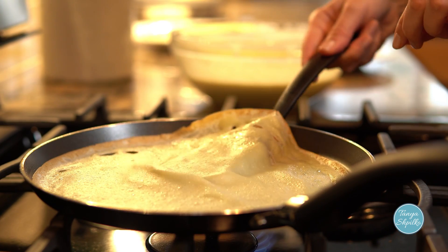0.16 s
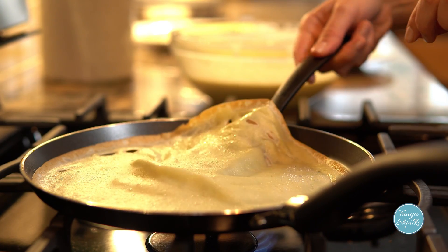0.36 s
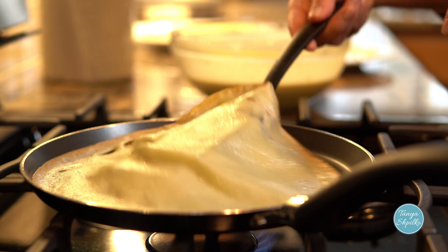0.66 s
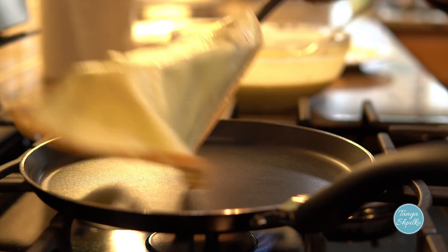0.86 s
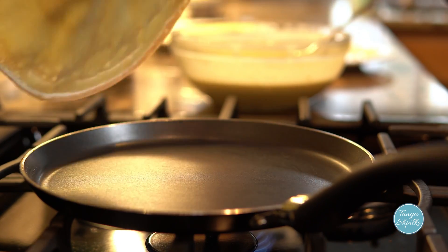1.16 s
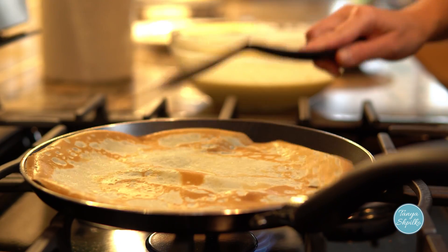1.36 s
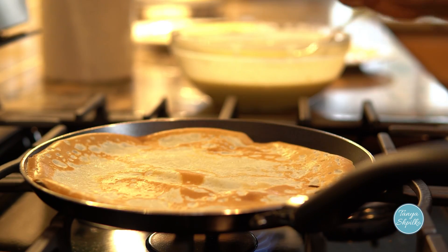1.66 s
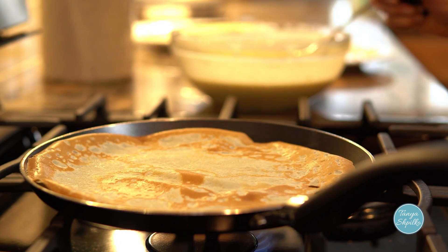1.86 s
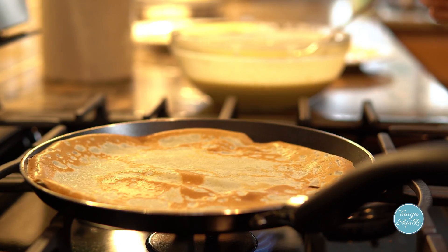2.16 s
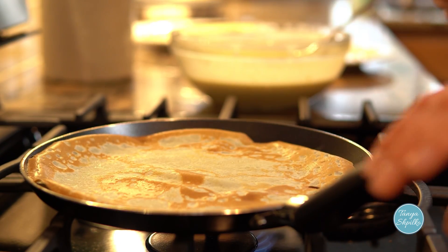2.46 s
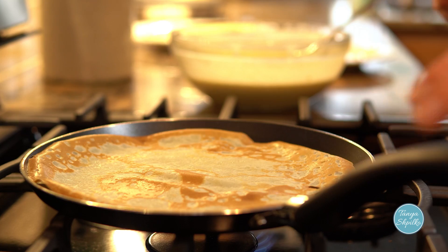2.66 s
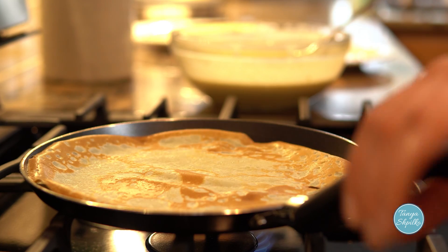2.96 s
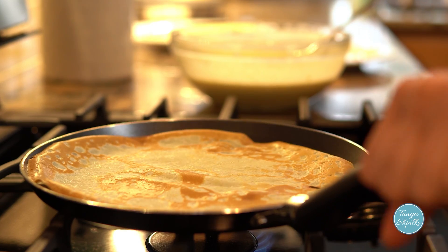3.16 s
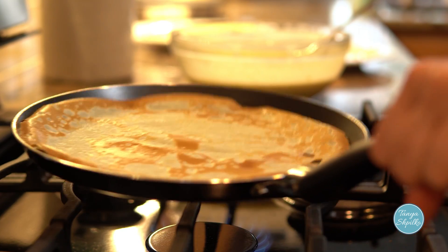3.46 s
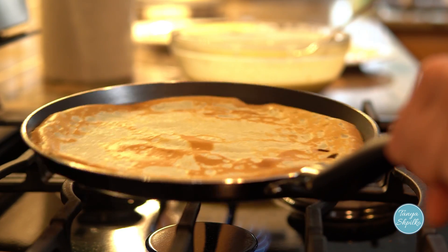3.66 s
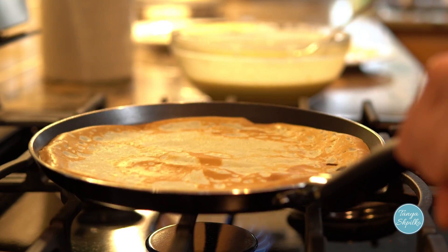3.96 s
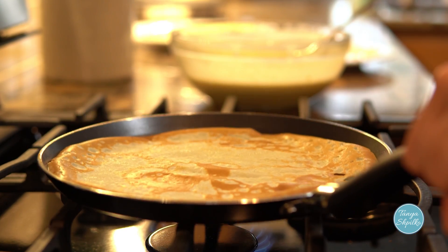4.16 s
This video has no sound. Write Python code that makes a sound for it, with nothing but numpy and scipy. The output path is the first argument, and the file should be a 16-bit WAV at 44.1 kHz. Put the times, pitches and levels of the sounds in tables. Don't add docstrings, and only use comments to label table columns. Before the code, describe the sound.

Quiet kitchen hum, a floppy slap and sudden crackling sizzle, then a short metallic drag and sharp knock as the pan lifts off the hob.

```python
import sys
import numpy as np
from scipy import signal
from scipy.fft import rfft, irfft
from scipy.io import wavfile
from scipy.ndimage import uniform_filter1d

SR = 44100
rng = np.random.default_rng(int(sys.argv[2]) if len(sys.argv) > 2 else 0)


def nominal_scale(level):
    x = np.asarray(level, float) / 20
    return 10 ** x


def store_pcm(level_fs):
    pcm = np.round(np.clip(level_fs, -1, 1) * 32767).astype(np.int16)
    wavfile.write(sys.argv[1], SR, np.atleast_2d(pcm).T)


N = 190268
TIME = np.arange(N) / SR
LAND_S, LIFT_S = 1.358, 3.34

# f/Hz, likeness [0-1]
STEAM_SAME = [(60, 1.0), (150, 1), (380, 0.96), (950, 0.79), (2380, 0.74), (5980, 0.53), (15000, 0.59)]


def evened(x):
    return x / np.sqrt(np.mean(x ** 2) + 1e-20)


def read(points, hz):
    f, value = np.transpose(points)
    return np.interp(np.log(hz + 1), np.log(f + 1), value)


def add(mix, s, sound):
    part = mix[..., round(s * SR):][..., :sound.shape[-1]]
    part += sound[..., :part.shape[-1]]


def resonate(x, hz, width):
    turn = np.exp(2j * np.pi * np.cumsum(hz * np.ones(len(x))) / SR)
    r = np.exp(-np.pi * width / SR)
    return 2 * (turn * signal.lfilter([1 - r], [1, -r], x / turn)).real


def coloured(x, points):
    n = x.shape[-1]
    gain = nominal_scale(read(points, np.fft.rfftfreq(n, 1 / SR)))
    return evened(irfft(rfft(x) * gain, n))


def clicks(shape, per_s, spread_db):
    when = rng.random(shape)
    size = rng.exponential(1, shape)
    sign = rng.choice([-1., 1.], shape)
    return (when < per_s / SR) * sign * nominal_scale(spread_db * np.minimum(size, 4))


def paired(x, same):
    same = np.clip(same, 0, 1)
    return np.array([x[0], same * x[0] + np.sqrt(1 - same ** 2) * x[1]])


def kitchen():
    # f/Hz, density level/dB
    air = [(15, -63.5), (25, -24), (50, -4.5), (75, -5), (260, -11.5), (359, -12.5), (445, -17.5),
           (722, -20.5), (1300, -27.5), (1660, -26.5), (2170, -31), (3830, -36), (15500, -50.5)]
    # f/Hz, likeness [0-1]
    air_same = [(60, 1.0), (180, 0.4), (550, 0.56), (1650, 0.24), (4970, 0.41), (15000, 0.36)]
    # f/Hz, width/Hz, level/dB
    jets = [
        (71, 21, -70.5),
        (92.15, 25, -66),
        (373.6, 66, -74),
        (3003, 566, -78),
        (3814, 610, -78.5),
    ]
    z = paired(rfft(rng.standard_normal((2, N))), read(air_same, np.fft.rfftfreq(N, 1 / SR)))
    noise = irfft(z, N)
    swell = nominal_scale(-2.5 + 6.5 * np.exp(-((TIME - 3.37) / 0.57) ** 2))
    bands = np.zeros((2, N))
    for band, ear in zip(bands, noise):
        for hz, width, db in jets:
            tone = evened(resonate(resonate(ear, hz, width), hz, width))
            band += nominal_scale(db) * tone * (swell if hz < 200 else 1)
    return nominal_scale(-64.5) * coloured(noise, air) + bands


def room(x):
    # f/Hz, t60/s
    decay = [(200, 0.23), (1000, 0.33), (4000, 0.248), (12000, 0.22)]
    # f/Hz, level/dB
    bass = [(150, -12), (450, -5), (900, 0)]
    taps = np.zeros((2, SR // 2))
    slots = np.arange(120, SR // 2 - 20, 20)
    at = slots + rng.integers(0, 20, (2, len(slots)))
    np.put_along_axis(taps, at, rng.choice([-1., 1.], at.shape), 1)
    hz, t, z = signal.stft(taps, SR, nperseg=256)
    z = paired(z, read(STEAM_SAME, hz)[:, None] - .25)
    decay_db = read(bass, hz)[:, None] - 60 * t / read(decay, hz)[:, None]
    tail = signal.istft(z * nominal_scale(decay_db), SR, nperseg=256)[1]
    return signal.fftconvolve(x[None], tail / np.linalg.norm(tail[0]), axes=1)[:, :N]


def bumps():
    # t/s, peak level/dB, f/Hz, t60/s
    soft_blows = [(.8765, -35, 864, 0.0265), (.878, -40, 1870, 0.013), (1.366, -37, 205, .12),
                  (1.368, -39, 405, .15), (1.43, -37, 404, .5), (1.43, -41, 548, .4), (1.42, -43, 1040, .3),
                  (1.475, -41, 232, .3), (1.41, -36, 140, .06), (2.402, -52.5, 484, 0.056),
                  (2.405, -57, 542.4, 0.098), (2.416, -43, 215, 0.18), (2.42, -55.5, 308.3, 0.262),
                  (2.43, -55, 396.2, 0.187), (2.853, -44, 170, 0.12), (2.856, -45, 132, 0.3),
                  (2.887, -44, 155, 0.13), (2.912, -46, 140, .15), (2.951, -45, 135, 0.13),
                  (2.985, -48, 108, 0.185)]
    # t/s, peak level/dB, f/Hz, t60/s, rise/s
    rim = [
        (3.326, -28.5, 1750, 0.095, 0.005),
        (3.385, -25, 1750, 0.3, 0.05),
        (3.39, -33, 1776, .22, .03),
        (3.384, -36, 1797, 0.4, .05),
    ]
    out, t = np.zeros(N), np.arange(SR // 2) / SR
    soft = [(s, db, hz, t60, 0.58 / hz) for s, db, hz, t60 in soft_blows]
    for s, db, hz, t60, rise in soft + rim:
        add(out, s, nominal_scale(db - 60 * t / t60) * np.sin(2 * np.pi * hz * t) * (1 - np.exp(-t / rise)))
    return out


def stroke(peak, db, rise, fall, hz, note_db, upper_db, upper, rasp):
    t = np.arange(-SR // 10, SR // 5) / SR
    fade_db = -24 * np.where(t < 0, -t / rise, t / fall) ** 2
    slips = clicks(len(t), 8000, 3.2)
    tones = nominal_scale(note_db) * evened(resonate(resonate(slips, hz, 75.0), hz, 415))
    tones += nominal_scale(upper_db - 6.0) * evened(resonate(resonate(slips, *upper), upper[0], 590))
    return peak + t[0], nominal_scale(db + 1.3 * fade_db) * tones + nominal_scale(db + fade_db) * coloured(slips, rasp)


def scraping():
    # t/s at the peak, rasp level/dB, rise/s, fall/s, blade note f/Hz
    strokes = [
        [(.112, -52.5, .07, .05, 850), (.222, -61, .075, .055, 815)],
        [(.845, -65, 0.081, 0.0225, 798.5), (.878, -55, 0.03, 0.01, 865), (.912, -61, 0.042, -0.03, 860)],
    ]
    # f/Hz, width/Hz
    upper_notes = [
        (1280, 140),
        (2050, 770),
    ]
    # f/Hz, density level/dB
    rasps = [
        [(880, -34.5), (1500, 1.5), (2050, -3), (2800, -5.5), (3210, 0.5), (3800, -7.5), (4610, -11.5),
         (6250, -11), (7230, -14), (7980, -23.5), (15500, -41.5)],
        [(880, -50.5), (1500, -1), (1670, -14), (1860, -15), (2220, -25), (2590, -10), (3280, -2.5),
         (5190, -14), (6820, -16.5), (8540, -22.5), (15500, -23)],
    ]
    # blade note level/dB, upper note level/dB
    blade_db = [
        (-9.5, 3),
        (-2, 1),
        (9.5, 3),
        (-0.5, 4.5),
        (-12, -26),
    ]
    out = np.zeros(N)
    pushes = [(row, upper, rasp) for rows, upper, rasp in zip(strokes, upper_notes, rasps) for row in rows]
    for (row, upper, rasp), levels in zip(pushes, blade_db):
        add(out, *stroke(*row, *levels, upper, rasp))
    return out


def drag():
    # t/s, rumble level/dB
    pressure = [
        (3.165, -53),
        (3.178, -52),
        (3.193, -40.5),
        (3.25, -28),
        (3.311, -26),
        (3.338, -25.5),
        (3.423, -41.5),
        (3.62, -75),
    ]
    # f/Hz, width/Hz, level/dB
    grate = [
        (205, 23.4, 0),
        (228, 70, 4),
        (292, 40, -31),
    ]
    # f/Hz, width/Hz, level/dB
    body = [(333.2, 14, -4), (418.4, 25, -5), (465.8, 53, -3), (554.4, 14.5, -6.5), (646, 97, -1.5),
            (727, 89, -9), (851, 17.78, -9), (1040, 73, -5), (1173, 20, -5.5), (1365, 17, -5),
            (1573, 11, -13), (2013, 120, -5.5), (2130, 30, -13), (2670, 116, -14.5)]
    # t/s, level/dB
    bites = [
        (3.229, -42),
        (3.312, -36.5),
        (3.341, -42),
    ]
    # f/Hz, width/Hz, level/dB
    bite_notes = [
        (3800, 1900, 4),
        (6800, 270, -7),
    ]
    # f/Hz, level/dB, t60/s
    lifted = [(539, -48.5, 0.78), (562, -49, 0.565), (573.4, -52.5, 0.8), (606.5, -51, 1), (721, -49, 0.8),
              (737, -49.5, 0.75), (1175, -45, 0.55), (1200, -52, .45), (1314, -48, 0.71),
              (1515, -47.5, 0.69), (2140, -41, 0.45)]
    # t/s, peak level/dB, brightness f/Hz, grit level/dB
    catches = [
        (3.176, -34, 2100, -12.5),
        (3.1923, -29.5, 1215, -12.5),
        (3.2269, -22.5, 2130, -7.5),
        (3.265, -22.5, 1020, -6.5),
        (3.2984, -31, 1970, -14),
        (3.3154, -24, 2050, -5),
        (3.3258, -25, 1750, -12),
        (3.3399, -8, 1500, -14),
        (3.3543, -22, 1694, -26.5),
        (3.3849, -44.5, 1750, -15),
    ]
    s, rumble_db = np.transpose(pressure)
    t = np.arange(s[0], s[0] + 0.83, 1 / SR)
    press_db = np.interp(t, s, rumble_db)
    moving = np.clip((s[-1] - t) / 0.038, 0, 1) * np.clip((t - s[0]) / 0.017, 0, 1)
    slips = evened(clicks(len(t), 1700, 2.1)) * moving

    def shaken(modes, db):
        force = slips * nominal_scale(db)
        return sum(nominal_scale(d) * np.sqrt(SR / w / 8) * resonate(resonate(force, f, w), f, 4 * w) for f, w, d in modes)

    sound = shaken(grate, press_db - 24.0)
    sound += shaken(body, -15 + 0.66 * press_db - 10.5)
    bite = nominal_scale(-49.5 + 0.26 * press_db) + sum(nominal_scale(db - 1100 * abs(t - at)) for at, db in bites)
    squeal = sum(nominal_scale(d) * evened(resonate(resonate(slips, f, w), f, 2 * w)) for f, w, d in bite_notes)
    sound += bite * nominal_scale(-5.5) * evened(squeal)

    wobbles = rng.standard_normal((len(lifted), len(t)))
    wobbles = uniform_filter1d(uniform_filter1d(wobbles, 500, axis=1), 500, axis=1)
    for (hz, db, t60), wobble in zip(lifted, wobbles):
        decay = nominal_scale(db - 3.5 - 60 * 1.15 * (t - s[0]) / t60)
        add(sound, LIFT_S - s[0], decay * (1 + 1.05 * evened(wobble)) * np.sin(2 * np.pi * hz * t))

    u = np.arange(1024) / SR
    band = signal.butter(2, (900, 7000), "band", fs=SR)
    for (at, db, hz, grit_db), noise in zip(catches, rng.standard_normal((len(catches), 1024))):
        grit = evened(resonate(resonate(noise, hz, 1460), hz, 1440))
        grit += nominal_scale(grit_db) * signal.lfilter(*band, noise)
        grit *= nominal_scale(-60 * u / 0.041)
        add(sound, at - s[0], nominal_scale(db - 11.0) * grit / abs(grit).max())
    return s[0], sound


def brief_notes():
    # t/s at the peak, peak level/dB, f/Hz,
    # rise/s
    fold_notes = [(1.3644, -35.5, 3315, .0015), (1.3643, -34, 1050, 0.00194), (1.3724, -26, 1650, .002),
                  (1.372, -37, 2860, 0.00098), (1.375, -28, 1012, 0.00292), (1.374, -30, 2000, 0.00297),
                  (1.3725, -31, 650, 0.00203), (1.386, -31, 3117, .003), (1.388, -35, 841, 0.00394),
                  (1.391, -31, 1235, 0.00402), (1.391, -33, 1652, 0.00399), (1.391, -33.5, 1950, 0.00304),
                  (1.4075, -24, 1407, 0.00199), (1.411, -26, 3196, 0.0031), (1.4135, -25, 2013, .003),
                  (1.4145, -26.5, 2906, 0.001995), (1.414, -29, 4500, 0.0023), (1.4155, -25, 1605, 0.00299),
                  (1.413, -35, 855, 0.00303), (1.414, -33, 470, 0.004), (1.415, -31, 193, 0.00706),
                  (1.428, -32, 218.7, 0.0069), (1.426, -38, 489.3, 0.00596), (1.430, -36, 3227, .002),
                  (1.433, -32.5, 1621, 0.00302), (1.434, -32.5, 3797, 0.0021), (1.447, -35, 221, 0.01),
                  (1.487, -42.5, 224, .012), (1.451, -49, 904, .006), (1.481, -54, 872, 0.0081),
                  (1.501, -48, 397.6, 0.0101), (1.545, -54, 410.6, 0.0137), (1.802, -41, 2200, .003),
                  (1.801, -40, 3800, .002)]
    # t/s at the peak, peak level/dB, f/Hz, rise/s
    jolts = [(3.183, -42.5, 215, 0.0057), (3.202, -30, 225, 0.0075), (3.240, -26.5, 220, 0.0085),
             (3.272, -33, 211, 0.00606), (3.284, -35, 205, 0.0038), (3.301, -34, 227, 0.00413),
             (3.322, -33, 200.3, 0.00595), (3.334, -28.5, 208, 0.00707), (3.354, -35, 246.6, .004),
             (3.368, -36, 224, 0.0039), (3.379, -35.5, 209.3, 0.00398), (3.391, -40.5, 226, 0.00404),
             (3.415, -41.5, 198, 0.0068), (3.433, -41.5, 222.5, 0.0069), (3.445, -42, 236, 0.0038),
             (3.464, -52, 222, 0.0053)]
    # t/s at the peak, peak level/dB, f/Hz, rise/s
    bar_notes = [(3.197, -46.5, 1330, 0.00392), (3.199, -46, 1074, .004), (3.216, -47, 1053, .004),
                 (3.217, -47, 1354, .004), (3.228, -42.5, 2020, 0.0029), (3.231, -47, 1024, .004),
                 (3.249, -43, 736, .005), (3.264, -45, 2093, 0.00302), (3.267, -40, 1050, .003),
                 (3.275, -38, 455, .006), (3.277, -45, 793, .004), (3.291, -37, 564, .006),
                 (3.302, -43, 979, .004), (3.2275, -41.5, 4650, .002), (3.227, -48, 6900, .0015),
                 (3.227, -43.5, 3300, .001), (3.296, -40.5, 3760, .003), (3.309, -43, 4490, .002),
                 (3.314, -42, 4000, .002), (3.313, -43, 6800, .004), (3.3415, -39, 3700, .001),
                 (3.3435, -38, 5200, .001), (3.342, -41.5, 6520, .001), (3.304, -39, 636, .005),
                 (3.315, -35, 470.5, 0.0049), (3.311, -43, 1994, .009), (3.329, -38, 601, .006),
                 (3.3416, -24, 1197, .0016), (3.3411, -23.5, 1684, .0014), (3.343, -35, 2200, .002),
                 (3.342, -32, 2650, 0.00195), (3.353, -31, 397, 0.005), (3.30, -38, 352, .008),
                 (3.25, -42, 400, .008), (3.33, -37, 412, .006), (3.3565, -30, 1686, 0.002002),
                 (3.358, -36, 1040, .003), (3.365, -33, 1710, 0.00302), (3.367, -39.5, 780, 0.00404),
                 (3.373, -40, 486, 0.00496), (3.377, -38, 1300, .004), (3.390, -41, 1090, 0.00397),
                 (3.398, -43, 547, 0.01001), (3.401, -46, 2110, .006), (3.407, -40, 1530, 0.00602),
                 (3.436, -44, 678, 0.007024), (3.45, -47.5, 554.3, .012), (3.60, -64, 732, .025),
                 (3.64, -61, 553.7, .02)]
    # t/s at the peak, peak level/dB, f/Hz, rise/s
    blade_notes = [(.082, -53, 1243, 0.00607), (.097, -50, 1301, .008), (.116, -53, 815.3, 0.00705),
                   (0.11, -60, 1275, 0.00474), (.116, -56, 3177, 0.0046), (.232, -57.5, 817, .01),
                   (0.19, -59, 3316, .008), (.19, -60, 3600, .005), (.265, -60, 3250, .003),
                   (.24, -61, 1388, .008), (.835, -51, 818, 0.00998), (.86, -51, 805, .008),
                   (.876, -50, 1830, 0.0052), (.88, -50, 2300, .005), (.895, -51, 872, .005),
                   (.868, -53, 2200, .004), (.879, -54, 4300, .002), (.897, -58, 2250, .002),
                   (.92, -58, 880, .006), (.87, -54, 650, .008), (.885, -52, 1080, .005),
                   (.845, -57, 1050, .006), (.905, -58, 680, .008), (.12, -55, 3600, .004),
                   (.11, -58, 1900, .008), (.245, -60, 1750, .005)]
    out = np.zeros(N)
    for s, db, hz, rise in fold_notes + jolts + bar_notes + blade_notes:
        t = np.arange(0, 8 * rise, 1 / SR)
        swell = (t / rise * np.exp(1 - t / rise)) ** 2
        add(out, s - rise, nominal_scale(db) * swell * np.sin(2 * np.pi * hz * t))
    return out


def spurts(t):
    # t/s, swell level/dB
    escapes = [
        (1.41, 2.4),
        (1.56, 1.9),
        (1.82, 1.03),
        (2.42, 1.75),
        (2.57, 1.79),
        (2.83, 1.55),
        (3.7, 0.84),
        (3.878, 1.4),
    ]
    return sum(db * np.exp(-((t - s) / 0.067) ** 2) for s, db in escapes)


def steam_db(t):
    since = np.maximum(t - LAND_S, 0)
    simmer = -74.5 - 5 * t
    landed = -42 - 3.5 * since + 3 * np.exp(-since / 0.26) + spurts(t)
    share = np.minimum(since / 0.0183, 1)
    return (1 - share) * simmer + share * landed


def wetness(t):
    start, top, end, soak_s, drying_s = 0.67, 0.97, 0.3, 0.091, 1.342
    since = np.maximum(t - LAND_S, 0)
    soaked = top + (start - top) * np.exp(-since / soak_s)
    drying = end + (soaked - end) * np.exp(-(since / drying_s) ** 2)
    return np.where(t < LAND_S, 0.97, drying + 0.047 * spurts(t))


def sizzle():
    # f/Hz, density level/dB
    wet_colour = [(530, -30.5), (900, -31), (1130, -44), (1210, -16), (1510, -7.5), (1640, -8.5),
                  (1700, -10), (2230, -7), (2740, -12), (3200, -5), (5160, -12), (6400, -9), (7840, -13),
                  (13800, -17), (15700, -15)]
    # f/Hz, density level/dB
    dry_colour = [(530, -39.5), (900, -26.5), (1120, -31), (1160, -27), (1740, -25.5), (2030, -3.5),
                  (2550, -13), (2910, -7.5), (3160, 1), (4260, 2.5), (4800, -1), (6640, 4), (8230, -6.5),
                  (11000, -0.5), (15700, -17.5)]
    # f/Hz, level/dB
    tilted = [(2350, 0), (2480, -5), (2950, -3), (3120, 0), (6300, 0), (7500, 3.5), (7900, -0.5),
              (15650, 0), (15780, -25)]
    bursts = evened(clicks((2, N), 400, 4.2))
    hz, t, z = signal.stft(rng.standard_normal((2, N)) + .42 * bursts, SR, nperseg=512, noverlap=384)
    wet = np.clip(wetness(t), 0, 1.3)
    colour_db = np.outer(read(wet_colour, hz), wet) + np.outer(read(dry_colour, hz), 1 - wet)
    colour_db -= 10 * np.log10(np.mean(nominal_scale(colour_db) ** 2, axis=0))
    colour_db += np.outer(read(tilted, hz), np.clip((t - LIFT_S) / .25, 0, 1))
    late = (t > LAND_S) * np.exp(-np.maximum(t - LAND_S, 0) / .04)
    colour_db += -6 * np.outer(hz > 10600, late)
    patches = rng.standard_normal(colour_db.shape)
    patches = evened(uniform_filter1d(uniform_filter1d(patches, 8, axis=0), 20, axis=1))
    flicker = evened(uniform_filter1d(rng.standard_normal(len(t)), size=5))
    z = paired(z, read(STEAM_SAME, hz)[:, None]) * nominal_scale(colour_db + .7 * patches + .9 * flicker)
    steam = evened(signal.istft(z, SR, nperseg=512, noverlap=384)[1][:, :N])
    return steam * nominal_scale(steam_db(TIME))


def flares():
    # t/s, level/dB, rise/s, fall/s per 20 dB, lowest f/Hz
    hisses = [
        (1.349, -61, 0.01, 4, 3000),
        (1.431, -50, .002, -0.3, 8000),
        (1.406, -36, .0008, -0.05, 9000),
    ]
    out, t = np.zeros((2, N)), np.arange(SR // 8) / SR
    for s, db, rise, fall, low_hz in [(s, db, rise, abs(fall), hz) for s, db, rise, fall, hz in hisses]:
        grit = rng.standard_normal((2, len(t))) + evened(clicks((2, len(t)), 2500, 3.0))
        jet = evened(signal.lfilter(*signal.butter(2, low_hz, "high", fs=SR), paired(grit, .6)))
        add(out, s, nominal_scale(db - 20 * np.maximum(t - rise, 0) / fall) * np.minimum(t / rise, 1) * jet)
    return out


def pops():
    # t/s, peak level/dB, spray pitch f/Hz
    droplets = [(.1712, -41, 3300), (.285, -60, 4000), (.3436, -60, 5800), (.4589, -53, 15000),
                (.5097, -45, 13000), (.5237, -58, 7200), (.5651, -55, 11000), (.5811, -56, 4800),
                (.614, -60, 4200), (.631, -57, 10500), (.8787, -44, 5000), (1.1533, -51, 3600),
                (1.4688, -34, 12000), (1.5192, -33, 11000), (1.5356, -31, 11000), (1.5674, -31, 4500),
                (1.6432, -21, 7500), (1.6886, -29, 10000), (1.6977, -27, 6500), (1.742, -31, 6000),
                (1.7972, -33, 3000), (1.897, -34, 11000), (1.9811, -38, 12000), (2.0425, -31, 8000),
                (2.1442, -33, 13000), (2.1697, -35, 10000), (2.2814, -39, 13000), (2.3717, -39, 9000),
                (2.5573, -39, 12000), (2.5957, -38, 12000), (2.6905, -36, 11000), (2.5711, -31, 12500),
                (2.6643, -25, 9000), (2.7931, -31, 10000), (3.0761, -33, 11000), (3.1006, -40, 12000),
                (3.2547, -37, 12000), (3.4652, -39, 12000), (3.6553, -41, 12000), (3.77, -42, 12000),
                (3.9551, -42, 12000), (3.9865, -42, 12000), (3.5415, -34, 11500), (3.5578, -26, 8200),
                (3.8028, -36, 9500), (3.8215, -38, 7000), (3.9245, -37, 6500), (4.0339, -37, 12000),
                (4.2522, -40, 6000)]
    # lower f/Hz, upper f/Hz
    spray = [
        (2950, 4000),
        (5900, 7600),
        (8500, 15800),
    ]
    out, t = np.zeros(N), np.arange(1800) / SR
    for (s, db, hz), noise in zip(droplets, rng.standard_normal((len(droplets), 1800))):
        burst = np.sign(noise) * (nominal_scale(-60 * t / .006) + .12 * abs(noise) * nominal_scale(-60 * t / .035))
        tick = np.zeros(len(t))
        for low, high in spray:
            band = signal.lfilter(*signal.butter(3, (low, high), "band", fs=SR), burst)
            octaves = np.log2(hz / np.sqrt(low * high))
            tick += nominal_scale(-5 * octaves ** 2) * band / abs(band).max()
        add(out, s, nominal_scale(db) * tick / abs(tick).max())
    return out


def slaps():
    # t/s, peak level/dB, spread/s, pan mode level/dB, trapped air f/Hz
    folds = [
        (1.362, -28, 0.053, 2.5, 1050),
        (1.371, -13.5, 0.031, -24, 1560),
        (1.386, -17.5, 0.026, -19.5, 1240),
        (1.4054, -14.5, 0.023, -4.5, 1480),
        (1.412, -9.5, 0.017, -12.5, 1677),
        (1.428, -27, 0.015, -11, 1630),
    ]
    # f/Hz, density level/dB
    puff_colour = [(59, -47), (100, -25.5), (233, -6), (319, -36), (403, 4), (627, -6), (843, 2),
                   (1110, -5.5), (1370, -3.5), (2270, 0), (3180, -6.5), (5400, -10), (10600, -14),
                   (11600, -28), (15500, -34)]
    # f/Hz, width/Hz, level/dB
    pan = [(140, 37, -5), (200, 30, -11), (222, 29, -0.5), (318, 44, -24), (396.2, 20, -10), (410, 33, -14),
           (510, 30, -10), (555, 23, -8), (883, 62.7, -13), (1050, 47, -11)]
    out, t = np.zeros(N), np.arange(SR // 3) / SR
    for (s, db, spread, weight_db, hz), noise in zip(folds, rng.standard_normal((len(folds), len(t)))):
        puff = coloured(noise, puff_colour)
        puff = puff + 0.54 * evened(resonate(puff, hz, 520)) + .5 * evened(resonate(puff, 3163, 580))
        puff *= nominal_scale(-20 * t / spread) + 0.745 * nominal_scale(-20 * t / 0.0085)
        push = noise * t / .02 * np.exp(-t / 0.018)
        ring = sum(nominal_scale(d) * resonate(resonate(push, f, w), f, 3 * w) / np.sqrt(w) for f, w, d in pan)
        crack = puff * np.minimum(t / 0.0009, 1)
        add(out, s, nominal_scale(db - 19.5) * (crack + nominal_scale(weight_db - 17.0) * evened(ring)))
    return out


def scene():
    near = pops() + slaps() + bumps() + brief_notes()
    add(near, *drag())
    blade = scraping()
    far = near + nominal_scale(-6) * blade
    near = near + blade
    pan = np.array([near, np.roll(near, shift=1)]) + sizzle() + flares()
    return pan * nominal_scale(np.array([[1.1], [-1.1]])) + nominal_scale(-5.5) * room(far) + kitchen()


def gated(x):
    share = np.clip((np.fft.rfftfreq(N, 1 / SR) - 12850) / 250 + .5, 0, 1)
    top = irfft(rfft(x) * share, N)
    is_open = uniform_filter1d((top ** 2).mean(0), size=1500) > nominal_scale(-88.4) ** 2
    return x - top * (1 - uniform_filter1d(is_open * 1., size=800))


def roll_off(x):
    return signal.sosfilt(signal.butter(12, 15860, fs=SR, output="sos"), x)


def record(dry):
    # f/Hz, level/dB
    side_cut = [(30, -32), (150, -14.5), (300, -11), (600, -0.5), (5000, 1)]
    mid, side = (dry[0] + dry[1]) / 2, (dry[0] - dry[1]) / 2
    side = irfft(rfft(side) * nominal_scale(read(side_cut, np.fft.rfftfreq(N, 1 / SR))), N)
    ears = np.array([mid + side, mid - side])
    ears = signal.oaconvolve(ears, signal.firwin(255, 15780, fs=SR)[None], "same")
    return roll_off(gated(ears))


dry = scene()
out = record(dry)
store_pcm(out)
```